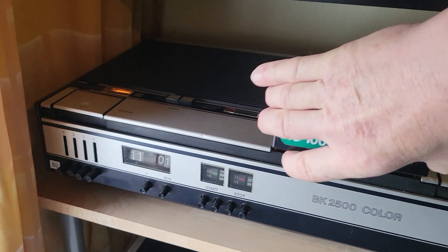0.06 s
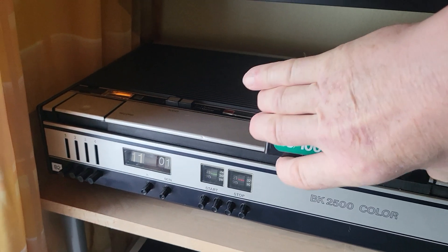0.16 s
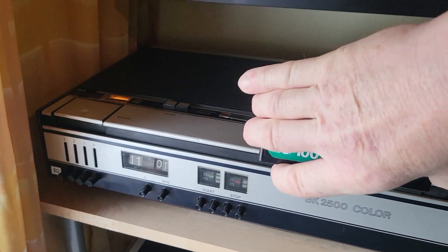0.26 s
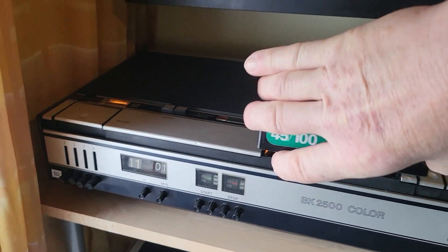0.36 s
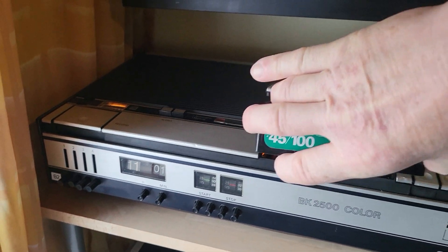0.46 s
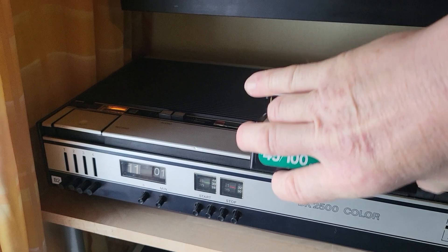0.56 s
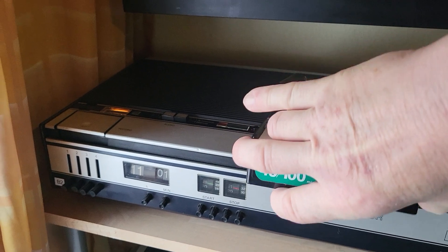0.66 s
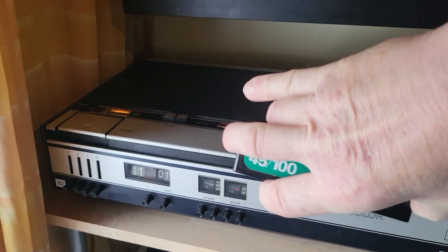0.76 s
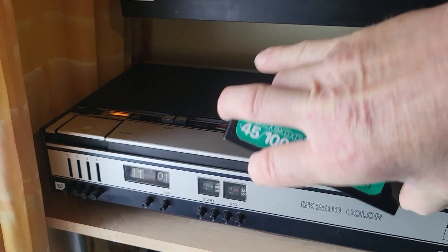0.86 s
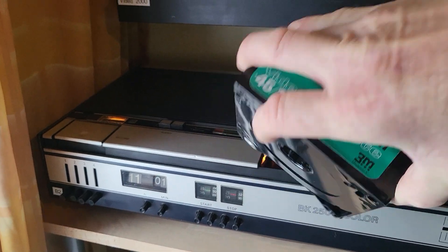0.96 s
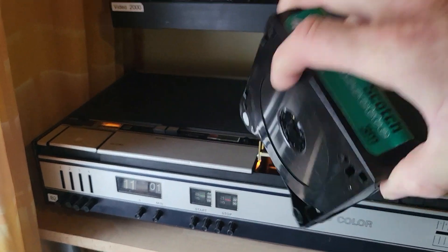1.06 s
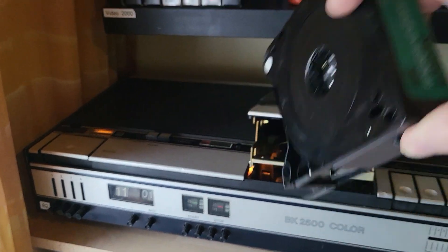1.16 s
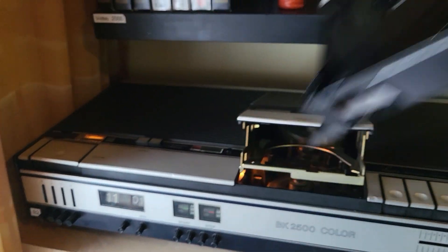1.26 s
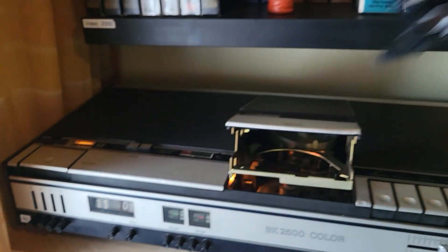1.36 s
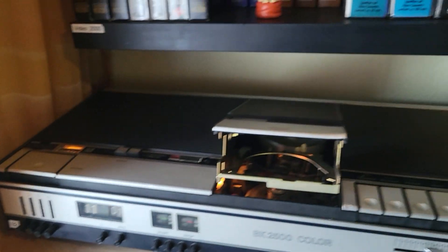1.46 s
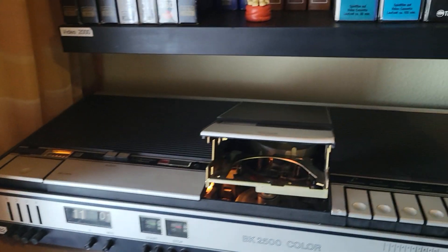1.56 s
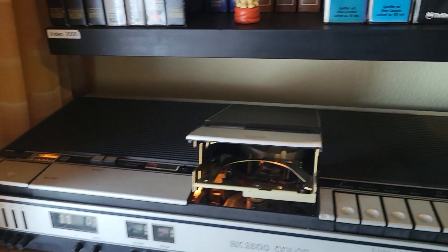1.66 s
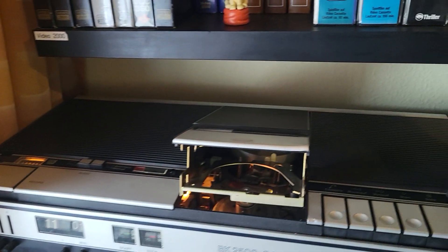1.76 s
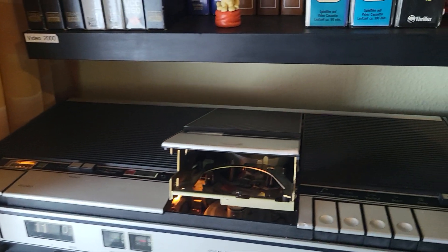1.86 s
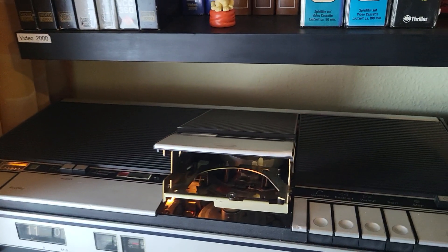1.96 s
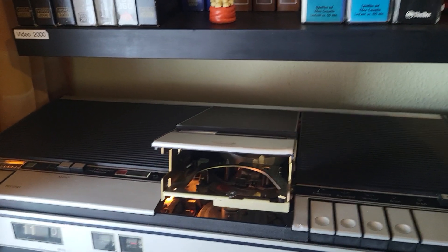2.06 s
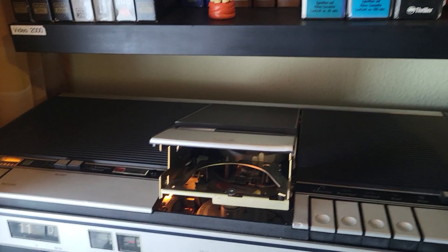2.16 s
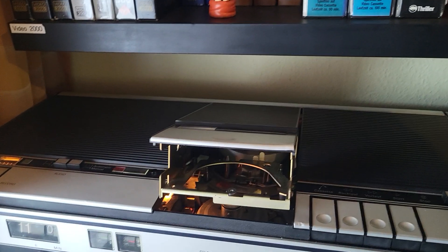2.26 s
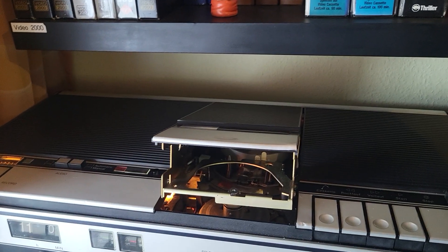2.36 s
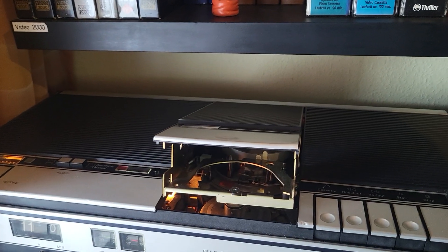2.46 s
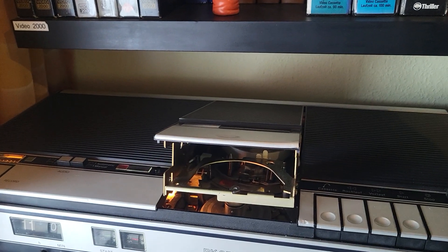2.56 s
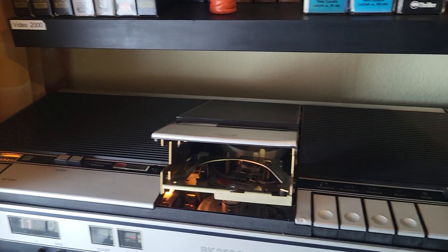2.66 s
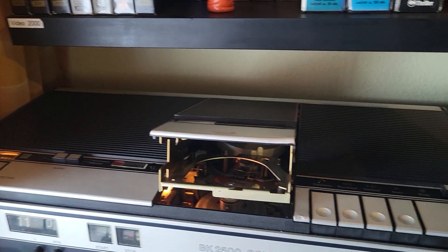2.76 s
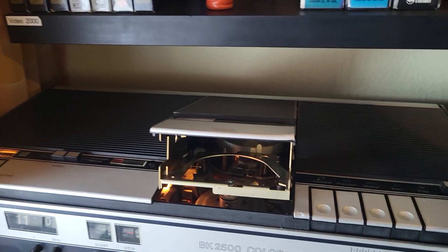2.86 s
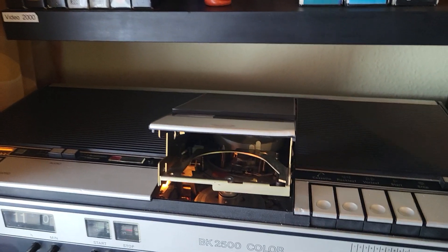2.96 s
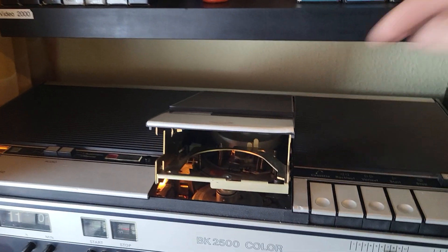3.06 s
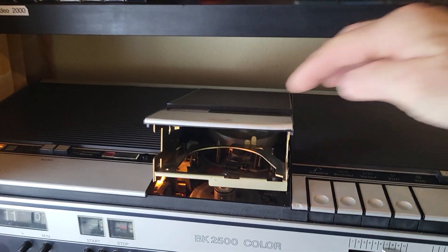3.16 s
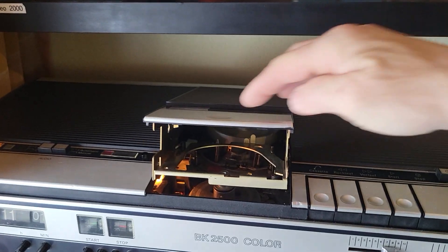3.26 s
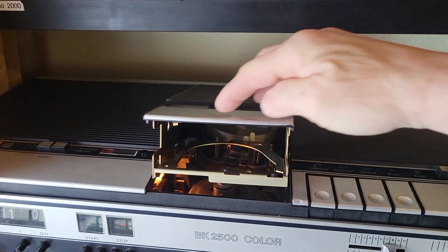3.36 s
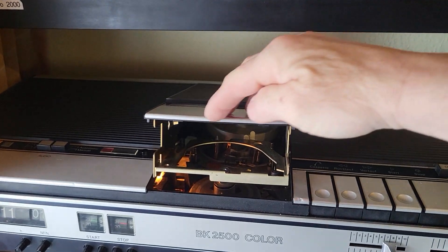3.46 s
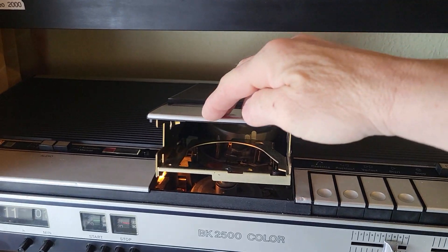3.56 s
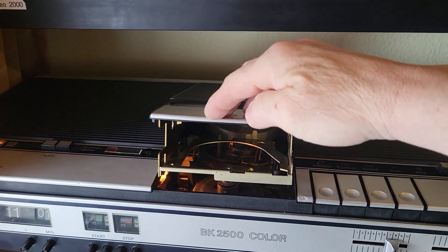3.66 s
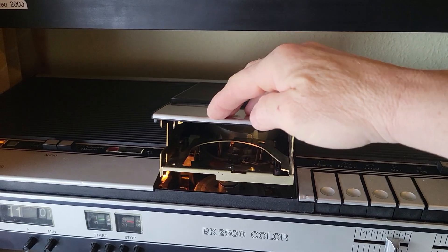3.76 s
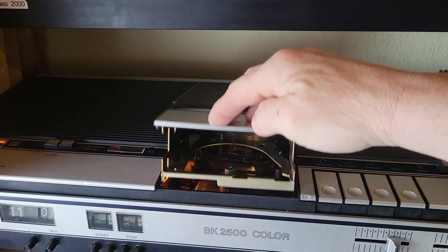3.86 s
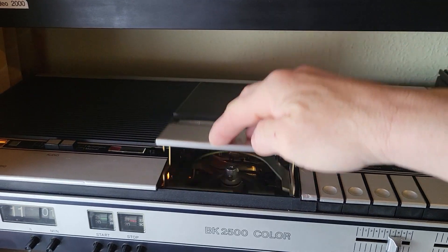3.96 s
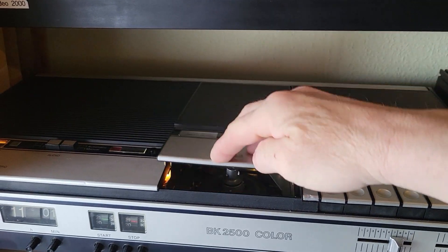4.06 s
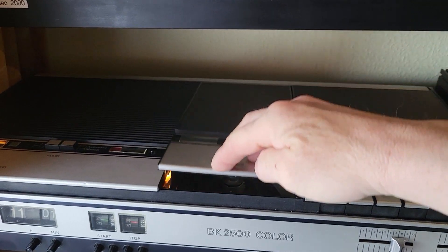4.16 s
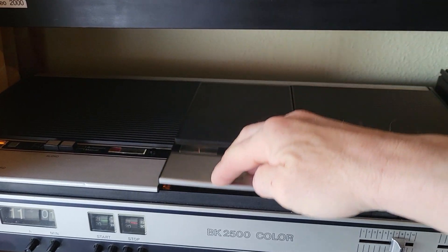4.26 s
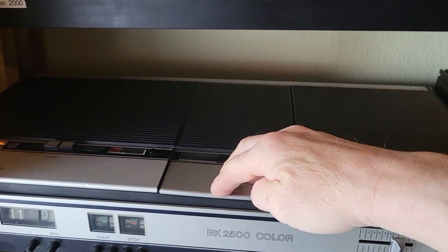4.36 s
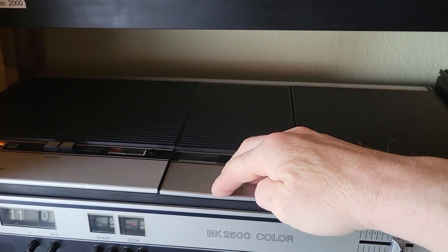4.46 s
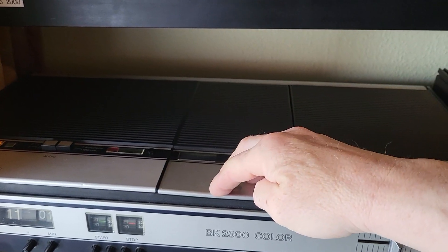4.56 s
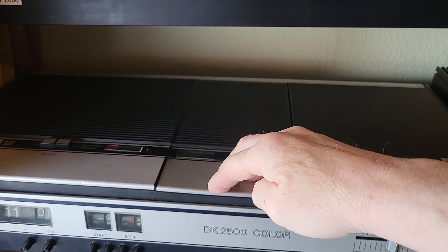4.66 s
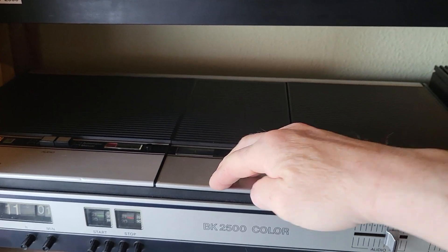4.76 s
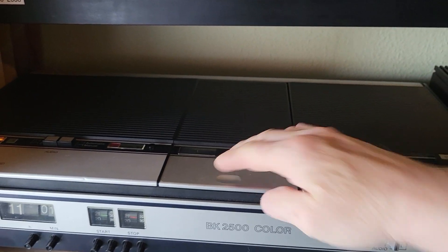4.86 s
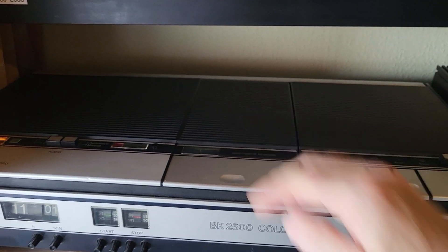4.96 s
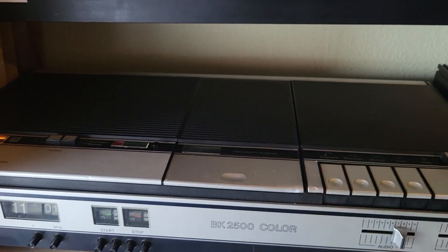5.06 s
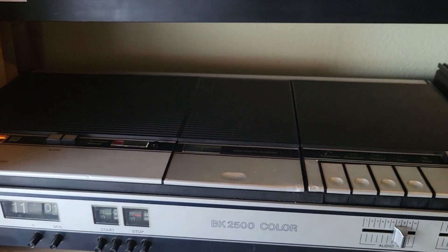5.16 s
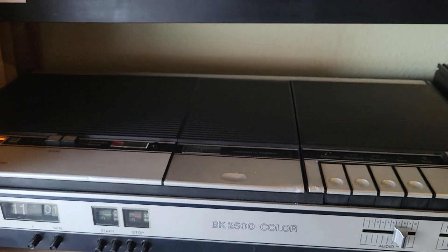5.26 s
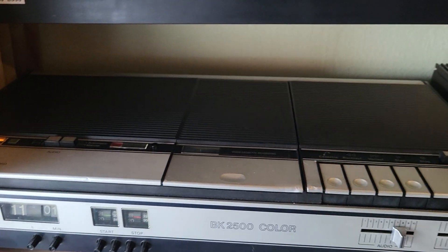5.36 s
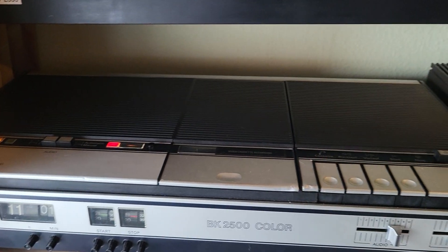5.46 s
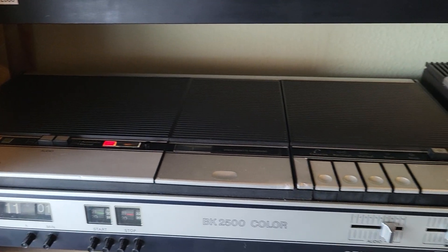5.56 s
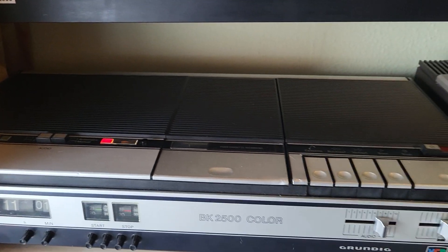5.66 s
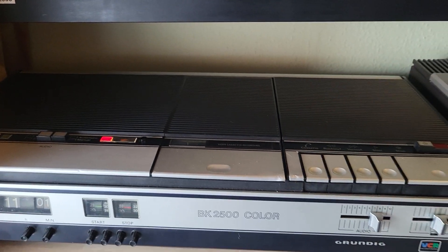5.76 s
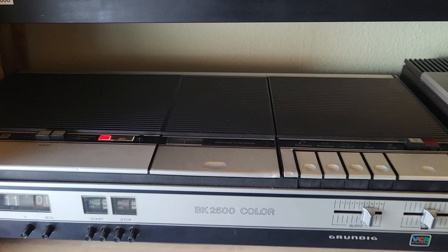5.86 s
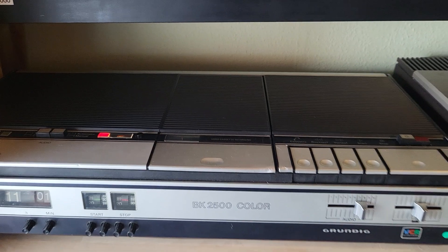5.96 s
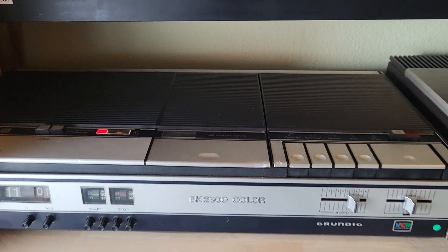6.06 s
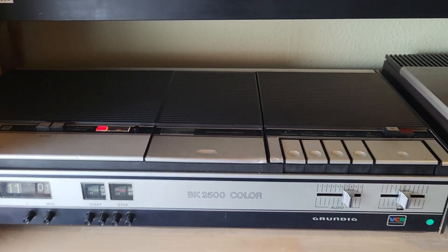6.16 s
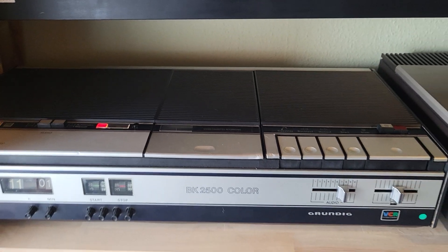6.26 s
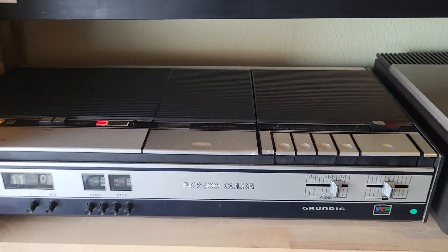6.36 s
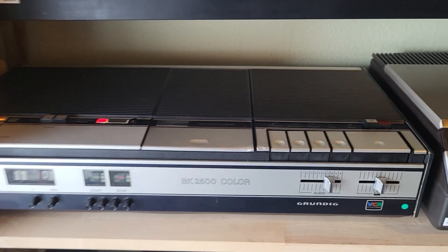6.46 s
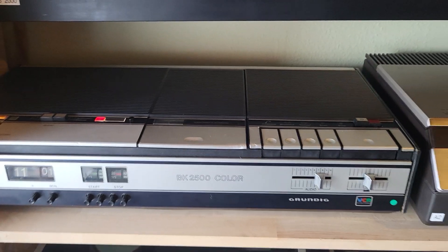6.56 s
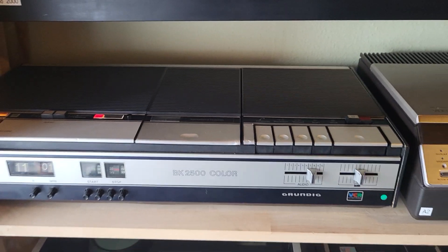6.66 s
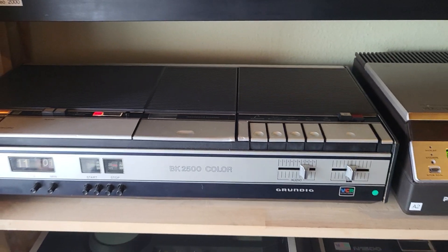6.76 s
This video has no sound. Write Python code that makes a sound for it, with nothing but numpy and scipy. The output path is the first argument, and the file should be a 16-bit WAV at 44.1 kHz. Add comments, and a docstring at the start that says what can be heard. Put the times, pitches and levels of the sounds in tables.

```python
"""A plastic rattle comes first: a cassette is pulled out of a top-loading video tape machine and set down.
Under it the machine hums and whirs, its wooden shelf booms, and two picture-line whistles sing near the
top of hearing. A hand presses the lid shut, the threading motor whines for a second and stops with a
clunk. Each blow is a burst of tiny contacts that rings the cassette shell or the chassis.
Heard in a small furnished room, close up, through the two microphones of a hand-held phone."""
import sys
import numpy as np
from scipy import signal
from scipy.fft import rfft, irfft
from scipy.io import wavfile
from scipy.ndimage import uniform_filter1d

SR = 44100
rng = np.random.default_rng(int(sys.argv[2]) if len(sys.argv) > 2 else 0)


def file_out(sig):
    """Save sig as 16-bit WAV at sys.argv[1]."""
    # one column per channel
    cols = np.atleast_2d(sig).T
    # limit, then scale
    lim = np.clip(cols, -1, 1)
    pcm = np.round(lim * 32767).astype(np.int16)
    wavfile.write(sys.argv[1], SR, pcm)


N = 300762
T = np.arange(N) / SR


def undb(db):
    return 10 ** (np.asarray(db, float) / 20)


def over_hz(table, hz):
    """Read (frequency, value) rows on a log-frequency axis."""
    at, value = np.transpose(table)
    return np.interp(np.log(hz + 1), np.log(at + 1), value)


def curves(table):
    """Join (time, values...) rows into one curve for each value column."""
    times, *columns = np.transpose(table)
    return [np.interp(T, times, column) for column in columns]


def band(x, lo_hz, hi_hz):
    sos = signal.butter(2, [lo_hz, min(hi_hz, .45 * SR)], "band", fs=SR, output="sos")
    return signal.sosfilt(sos, x)


def walk(rate):
    """Random levels held 1 / rate s and smoothed twice."""
    hold = int(SR / rate)
    steps = np.repeat(rng.standard_normal(N // hold + 1), hold)
    return uniform_filter1d(uniform_filter1d(steps, hold), hold)[:N]


def tone(hz):
    return np.sqrt(2) * np.sin(2 * np.pi * np.cumsum(hz + 0 * T) / SR)


def decay(t, t60):
    return np.exp(-np.log(1000) * t / t60)


def gate(on_s, off_s, edge_s):
    return np.clip(np.minimum(T - on_s, off_s - T) / edge_s + .5, 0, 1)


def pan(left_minus_right_db):
    return undb(np.array([[left_minus_right_db], [-left_minus_right_db]]) / 2)


def add(out, start_s, x):
    i = int(start_s * SR)
    out[:, i:i + x.shape[-1]] += x[..., :N - i]


def ring(contacts, modes, t, centre_hz, spread):
    """Contacts ring the modes near the centre; each blow lands elsewhere, so pitch and strength scatter."""
    hz, t60 = np.transpose(modes)[:, :, None]
    detune, strength = rng.standard_normal((2, len(modes), 1))
    waves = np.sin(2 * np.pi * hz * (1 + .02 * detune) * t) * decay(t, np.clip(t60, .015, .11))
    weights = np.exp(-(np.log(hz / centre_hz) / spread) ** 2) * undb(3 * strength)
    response = np.sum(weights * waves, axis=0)
    return signal.fftconvolve(contacts, response[None], axes=1)[:, :len(t)]


# Low modes of the thud under a blow: (frequency [Hz], t60 [s])
THUD_MODES = [(165, 0.035), (205, .08), (250, .05), (330, .05), (410, 0.07)]


def blows(knocks, scrapes, modes, ring_db, snap_hz, lag_s, pan_db, room_db):
    """Rattling contacts ring a body; returns the sound at the microphones and the sound sent to the walls."""
    near, far = np.zeros((2, N)), np.zeros((2, N))
    t = np.arange(int(.3 * SR)) / SR
    end_fade = np.clip(20 * (.3 - t), 0, 1)
    knock_rise_s, chatter_db, grit_db = .0011, -15.5, 5
    events = [row + (knock_rise_s,) for row in knocks] + scrapes
    for start_s, db, hz, thud_db, snap_db, crack_db, rattle_s, rise_s in events:
        chatter = undb(chatter_db) * decay(t, 2.7 * rattle_s)  # loose parts rattle on
        envelope = (1 - np.exp(-t / rise_s)) * (decay(t, rattle_s) + chatter) * end_fade
        # three unrelated rattles: one straight to the phone, two to the walls
        contacts = envelope * rng.standard_normal((3, len(t)))
        contact_sizes = np.repeat(rng.standard_normal(len(t) // 40 + 1), 40)[:len(t)]
        contacts *= undb(grit_db * contact_sizes)
        knock = band(contacts, hz / 1.9, hz * 2.3)
        body = ring(contacts, modes, t, hz, spread=.3)
        thud = ring(contacts, THUD_MODES, t, centre_hz=300, spread=.5)
        snap = -band(contacts, *snap_hz)  # inverted, as neighbouring bands meet out of phase
        crack = band(contacts, 8500, 16000)
        parts = [(knock, 0), (body, ring_db), (thud, thud_db), (snap, snap_db), (crack, crack_db)]
        sound = sum(undb(part_db) * x / np.linalg.norm(x, axis=1, keepdims=True) for x, part_db in parts)
        sound *= undb(db) * np.linalg.norm(envelope) / envelope.max()
        left = np.pad(sound[0], (int(lag_s * SR), 0))[:len(t)]  # the left microphone is further off
        add(near, start_s, pan(pan_db[int(start_s * SR)]) * np.array([left, sound[0]]))
        add(far, start_s, undb(room_db) * sound[1:])
    return np.array([near, far])


# Close knocks on the cassette shell; thud, snap and crack are relative to the knock:
# (time [s], level [dB], centre [Hz], thud [dB], snap [dB], crack [dB], rattle t60 [s])
CASSETTE_KNOCKS = [(0.002, -25, 1180, -6, -21, -11, .024), (0.03, -28.5, 1020, -12, -25, -23, 0.038),
                   (0.061, -19.5, 1380, -10, -11, -11.5, 0.015),
                   (0.124, -22.5, 1450, -10.5, -39, -24, 0.013), (0.191, -47, 1020, -9, -9, 3, 0.033),
                   (0.377, -52.5, 1430, -3, -7, -13, .1), (0.417, -40.5, 990, 6.5, -38, -8, 0.055),
                   (0.611, -24.5, 1010, -12.5, 2.5, -21, 0.015), (0.705, -22, 884, -24, 3.5, -34, 0.019),
                   (0.727, -27, 1390, -3, -30, -25, 0.014), (0.761, -17, 1580, -25, 1.5, -16, 0.013),
                   (0.825, -32.5, 900, -18, -2, -23, .05), (0.89, -34.5, 1540, -23, -9, -17, 0.017),
                   (0.925, -15, 940, -39, 0, -4.5, 0.023), (1.05, -44, 1380, -18, -5, -16, 0.079),
                   (1.325, -35.5, 990, -23, -28, -15.5, 0.035), (1.36, -35.5, 1370, -28, -9, -17, 0.015),
                   (1.445, -41, 770, -24, -25, -17, 0.015), (1.665, -39, 2620, -32, -3, -48, 0.019),
                   (2.161, -36, 2210, -11, -1, -13, 0.036), (2.197, -28, 1100, -5, 4, -28, 0.025),
                   (2.223, -20, 2740, -23, -6, -41, 0.014), (2.273, -28, 830, -10, -7, -38, 0.0065),
                   (2.402, -41.5, 1020, -8, -4.5, -26, 0.025), (2.41, -38, 1080, -10, -4.5, -17, 0.025),
                   (2.447, -56.5, 1090, -24, 11.5, 5, 0.072), (2.469, -30, 1260, -44, 14, 4, 0.17),
                   (2.494, -31.5, 1540, -39, 16, -19, 0.034)]
# Scrapes, first of the cassette and later of the machine:
# (time [s], level [dB], centre [Hz], thud [dB], snap [dB], crack [dB], rattle t60 [s], rise [s])
SCRAPE_STROKES = [(0.0, -54.5, 1200, 3, 9, -11, .3, .005), (0.14, -55, 1230, -6, -1.5, -8, 0.39, 0.12),
                  (0.6, -45.5, 1940, 1, 0, -11, 0.062, 0.011), (0.78, -43, 1310, -5, -12, -20, .3, .03),
                  (4.041, -58, 930, 12, -25, -20, 0.11, .007), (4.282, -54, 990, 13, -7, -21, .5, 0.039),
                  (4.42, -48.5, 1870, -10, 3.5, -6, 0.73, 0.012),
                  (5.329, -41, 1080, -3.5, 6, -17, 0.13, 0.0081),
                  (6.621, -53, 850, -4.5, -18, -19, .34, 0.027)]
# Modes of the plastic shell: (frequency [Hz], t60 [s])
SHELL_MODES = [(510, 0.021), (720, 0.035), (880, 0.045), (1040, 0.04), (1190, .035), (1380, .03),
               (1560, 0.04), (1900, .025), (2080, 0.025), (2650, 0.018), (3150, .016)]
# The cassette passes left of the phone, then off to the right: (time [s], left minus right [dB])
CASSETTE_PATH = [(0, -2), (.9, 4.5), (1.7, 0.5), (2.5, -4.5)]
CASSETTE_DOWN_S = 3


def cassette():
    """The plastic shell clacks and scrapes as it is pulled out, carried past the phone and set down."""
    scrapes = [row for row in SCRAPE_STROKES if row[0] < CASSETTE_DOWN_S]
    return blows(CASSETTE_KNOCKS, scrapes, SHELL_MODES, ring_db=0, snap_hz=(2400, 7140),
                 lag_s=.00016, pan_db=curves(CASSETTE_PATH)[0], room_db=0)


# How alike machine noise is at the two microphones: (frequency [Hz], correlation [0-1])
MIC_CORRELATION = [(60, 0.17), (290, 1), (640, 0.72), (1400, 0), (3000, .0)]


def machine_noise(spectrum):
    """Stereo noise of a given colour and rms 1, most alike left and right in the low mids."""
    hz = np.arange(N // 2 + 1) * SR / N
    alike = over_hz(MIC_CORRELATION, hz)
    mid, side = rfft(rng.standard_normal((2, N))) * undb(over_hz(spectrum, hz))
    stereo = irfft(mid * np.sqrt(1 + alike) + side * np.sqrt(1 - alike) * np.array([[1], [-1]]), N)
    return stereo / np.sqrt(np.mean(stereo ** 2))


# The running machine from close by: (time [s], hum [dB], air [dB], bearings [dB])
IDLE_LEVELS = [(0, -42.5, -40.5, -32.5), (.4, -50.5, -49, -64.5), (.85, -42.5, -50.5, -59.5),
               (1.5, -44.5, -54, -67), (2.44, -39, -50, -58), (2.52, -49.5, -54, -58),
               (2.95, -46, -57, -71), (3.8, -48.5, -56.5, -70), (4.5, -43.5, -45.5, -62.5),
               (4.75, -46, -47, -65), (4.9, -58, -48.5, -69), (5.08, -46, -50.5, -50),
               (5.6, -43, -49.5, -58), (6.3, -43, -51, -58.5), (6.82, -41.5, -51, -58.5)]
# Motor hum, a little under mains pitch: (time [s], frequency [Hz])
HUM_PITCH = [(0, 49.2), (.9, 48.8), (1.1, 48.3), (4.3, 48.4), (5.2, 47.7), (6.4, 47.7), (6.82, 48.2)]
# Transformer partials: (frequency [Hz], level relative to the hum [dB])
TRANSFORMER_BUZZ = [(99.8, -28.5), (199.4, -27.5), (299.3, -26.5), (802, -26.5), (1592, -31)]
# Low rush of air: (frequency [Hz], relative density [dB])
AIR_SPECTRUM = [(25, -54), (40, -35), (62, -19.5), (75, -25), (110, -35.5), (165, -37), (205, -33),
                (243, -36.5), (287, -32.5), (355, -36.5), (500, -38.5), (780, -32), (1330, -41),
                (1640, -40), (2050, -38), (2400, -49), (4000, -53), (6000, -76.5)]
# Fine whirr of the bearings: (frequency [Hz], relative density [dB])
BEARING_SPECTRUM = [(1500, -47.5), (2500, -3), (3760, -8.5), (4300, -7.5), (5240, -7.5), (5750, -1),
                    (6810, -7), (7570, -2.5), (9090, -15.5), (12500, -20), (13500, -18.5), (15000, -36),
                    (15600, -15.5)]


def idling_machine():
    """Motor hum, transformer buzz, air and bearing noise; the hum dips while the threading motor pulls."""
    hum_db, air_db, bearing_db = curves(IDLE_LEVELS)
    hum = tone(curves(HUM_PITCH)[0])
    buzz = sum(undb(db + 2 * walk(6.6)) * tone(hz) for hz, db in TRANSFORMER_BUZZ)
    air = undb(air_db + walk(9)) * machine_noise(AIR_SPECTRUM)
    bearings = undb(bearing_db + walk(12)) * machine_noise(BEARING_SPECTRUM)
    return undb(hum_db) * (hum + buzz) + air + bearings


# Pitches of the two picture-line whistles: (time [s], lower [Hz], upper [Hz])
WHISTLE_PITCHES = [(0, 15580, 15741), (5.1, 15580, 15740), (5.6, 15580, 15726), (6.82, 15581, 15730)]
# Their mean levels at the phone: (time [s], lower [dB], upper [dB])
WHISTLE_LEVELS = [(0, -55, -43.5), (.9, -47, -62), (1.4, -60, -62), (2, -47, -60.5), (2.7, -63.5, -56.5),
                  (3.6, -69, -54.5), (4.401, -49.5, -54.5), (5.1, -49, -74), (5.7, -52, -63),
                  (6.82, -48.5, -64)]


def line_whistles():
    """Line-rate tones waver as the phone drifts through their standing waves, stronger on the right."""
    out = np.zeros((2, N))
    flutter = 1 + .06 * tone(50) + .03 * tone(110)  # weak sidebands
    for hz, db, pan_db in zip(curves(WHISTLE_PITCHES), curves(WHISTLE_LEVELS), (-2.5, -7)):
        # each microphone meets another part of the standing wave
        at_mics = np.array([undb(5.5 * walk(11)) * tone(hz + 4 * walk(8)) for _ in range(2)])
        out += undb(db + 3 * walk(7)) * pan(pan_db) * at_mics * flutter
    return out


# Booms of the wooden shelf under the machine: (time [s], level [dB], frequency [Hz], t60 [s])
SHELF_BOOMS = [(0.07, -46, 57.9, 0.32), (0.739, -39, 72, 0.4), (0.9, -41, 73.4, 1),
               (4.041, -35.5, 127, 0.46), (4.08, -37, 72.4, 1.0), (4.341, -33, 68.3, 0.27),
               (4.401, -37, 70.1, 0.52), (4.46, -26, 55.7, 0.32), (4.778, -37, 128, 0.46),
               (6.041, -17, 73.5, 0.048)]


def shelf():
    """Soft low blows from the hand and the moving parts ring the board, alike at both microphones."""
    out, t = np.zeros((2, N)), np.arange(SR) / SR
    swell = 1 - np.exp(-t / .013)
    for start_s, db, hz, t60 in SHELF_BOOMS:
        add(out, start_s, undb(db) * swell * np.sin(2 * np.pi * hz * t) * decay(t, t60))
    return out


# Close knocks on the chassis; thud, snap and crack are relative to the knock:
# (time [s], level [dB], centre [Hz], thud [dB], snap [dB], crack [dB], rattle t60 [s])
CHASSIS_KNOCKS = [(3.5, -64, 775, -3.5, -1, -19, .04), (3.949, -41, 1970, -11.5, -3.5, -31.5, .024),
                  (4.021, -34, 704, 2.5, -8.5, -43, 0.036), (4.072, -39, 786, -1, -18, -28, 0.022),
                  (4.301, -61, 953, 2, -11, -20, 0.023), (4.34, -39.5, 740, -3, -14, -11, 0.1),
                  (4.36, -23.5, 960, 1, -1.5, -39, 0.051), (4.376, -23.5, 1790, -1.5, -28, -10, 0.06),
                  (4.39, -23, 760, -8, 9, -0.5, 0.021), (4.524, -34, 1880, 1.5, -0.5, -7, 0.048),
                  (5.354, -33, 1040, -9, -8, -6, 0.033), (5.414, -19.5, 873, -1, -19, -10, 0.04),
                  (5.974, -51.5, 720, 6, -1.5, -17, 0.042), (6.43, -46.5, 840, -25, -14, -20, 0.12),
                  (6.507, -51, 850, -15, -3, -23, 0.047), (6.561, -52, 615, -4, -18, -16, 0.082)]
# Modes of the chassis: (frequency [Hz], t60 before ring() caps it [s])
CHASSIS_MODES = [(480, 0.21), (694, 0.11), (800, 0.048), (990, 0.066), (1141, 0.05), (1384, 0.029),
                 (1870, 0.05), (2250, 0.02), (2790, 0.024)]


def lid_and_loading_gear():
    """Lid, latch and loading gear strike and scrape the chassis, louder at the left microphone."""
    scrapes = [row for row in SCRAPE_STROKES if row[0] >= CASSETTE_DOWN_S]
    return blows(CHASSIS_KNOCKS, scrapes, CHASSIS_MODES, ring_db=-2.5, snap_hz=(3350, 7900),
                 lag_s=.0001, pan_db=np.full(N, 4), room_db=-3)


# The motor spins up, then slows a little under load: (time [s], gear mesh [Hz], commutator [dB])
MOTOR_RUN = [(4.52, 1782, -58), (4.66, 1930, -54), (4.74, 1977, -42), (4.82, 1997, -56),
             (4.92, 1978, -43.5), (5.05, 2017, -44.5), (5.18, 1977, -45), (5.33, 1958, -42.5),
             (5.37, 1934, -53), (5.42, 1880, -51)]
# Other partials of the gears: (frequency [multiple of the mesh], level relative to the mesh [dB])
GEAR_PARTIALS = [(2, -10), (3, -15), (4, -13), (.4, -18), (.473, -17), (.6, -19)]
# Two fluttering buzzes of fixed pitch, near 700 Hz and lower, while the motor pulls: (frequency [Hz], level
# [dB])
LOAD_TONES = [(704, -47.5), (466, -64)]
# Whirr of the brushes: (frequency [Hz], relative density [dB])
BRUSH_SPECTRUM = [(150, -57), (400, -13.5), (1000, -12), (1800, -7), (2350, -16), (3600, -7.5),
                  (4400, -12.5), (5800, -10.5), (6800, -12.5), (8000, -8), (9500, -15.5), (15500, -11)]


def threading_motor():
    """Meshing gears whine, two fixed-pitch buzzes flutter while the motor pulls, and the brush noise pulses
    with the commutator."""
    on_s, full_speed_s, off_s = 4.526, 4.71, 5.418
    mesh_hz, commutator_db = curves(MOTOR_RUN)
    mesh_hz *= 1 + .002 * walk(60)
    whine = undb(2.6 * walk(150)) * tone(mesh_hz)
    for order, db in GEAR_PARTIALS:
        whine += undb(db + 3 * walk(60)) * tone(order * mesh_hz * (1 + .007 * walk(220)))
    whine *= undb(-41.5 - 3.5 * gate(0, full_speed_s, .037))  # weaker until full speed
    commutator = tone(.3 * mesh_hz)
    flutter = sum(undb(db + 3.5 * walk(45)) * tone(hz + 9 * walk(45)) for hz, db in LOAD_TONES)
    flutter *= gate(on_s=4.87, off_s=5.32, edge_s=.05)
    brushes = machine_noise(BRUSH_SPECTRUM) * (1 + .13 * commutator) * undb(1.3 * walk(160))
    inrush_db = 18.5 * np.exp(-np.abs(T - on_s) / .027)  # the brushes rasp at switch-on
    tones = whine + undb(commutator_db) * commutator + flutter
    return gate(on_s, off_s, .008) * (pan(1) * tones + undb(-37.5 + inrush_db) * brushes)


# Reverberation of the small furnished room: (frequency [Hz], t60 [s])
ROOM_DECAY = [(250, 0.24), (1000, 0.19), (2000, 0.21), (4000, 0.24), (8000, 0.16), (14000, 0.15)]


def room(sent):
    """Dense echoes die fastest in the high treble; their bass reaches both microphones alike."""
    t = np.arange(SR // 2) / SR
    tail = np.zeros((2, len(t)))
    for hz in 125 * 2 ** np.arange(8):
        octave = band(rng.standard_normal(tail.shape), hz / np.sqrt(2), hz * np.sqrt(2))
        tail += octave * decay(t, over_hz(ROOM_DECAY, hz))
    tail *= 1 - np.exp(-t / .00022)
    tail /= np.sqrt(np.sum(tail ** 2) / 2)
    left, right = signal.fftconvolve(sent, tail, axes=1)[:, :N]
    mid, side = left + right, band(left - right, 600, 20000)
    return undb(.5) * np.array([mid + side, mid - side]) / 2


def scene():
    """Everything as it reaches the phone; only the knocks and scrapes echo in the room."""
    near, far = cassette() + lid_and_loading_gear()
    return near + room(far) + shelf() + threading_motor() + idling_machine() + line_whistles()


# Colour of the phone's two microphone ports: (frequency [Hz], left minus right [dB])
MIC_BALANCE = [(60, 1), (250, -2.5), (600, 2), (1300, 3.5), (2400, 2), (4400, 1), (8000, -2.5), (15000, -1)]


def record(dry):
    """The phone colours left and right, drops the lowest bass, rounds the peaks and cuts the top."""
    bottom_hz, top_hz, ceiling = 37, 15900, .72
    hz = np.arange(N // 2 + 1) * SR / N
    tilt = undb(np.outer([.5, -.5], over_hz(MIC_BALANCE, hz)))
    coloured = irfft(rfft(dry) * tilt, N)
    bass_cut = signal.sosfilt(signal.butter(5, bottom_hz, "high", fs=SR, output="sos"), coloured)
    rounded = ceiling * np.tanh(bass_cut / ceiling)
    return signal.sosfilt(signal.ellip(12, .2, 100, top_hz, fs=SR, output="sos"), rounded)


dry = scene()
out = record(dry)
file_out(out)
```